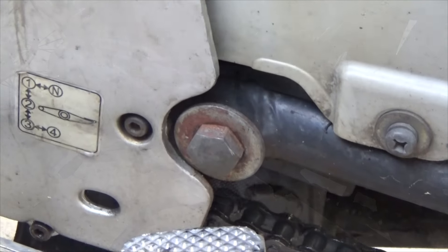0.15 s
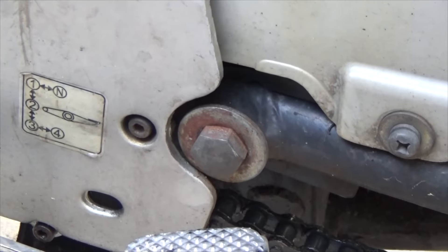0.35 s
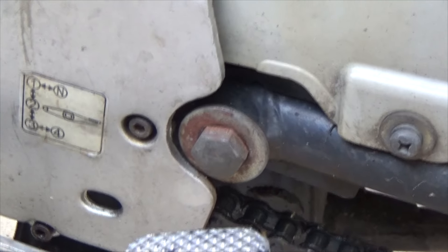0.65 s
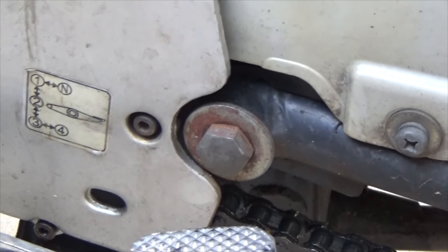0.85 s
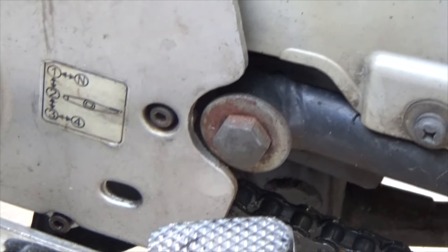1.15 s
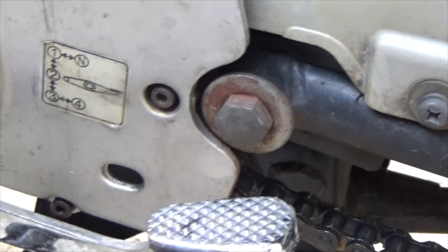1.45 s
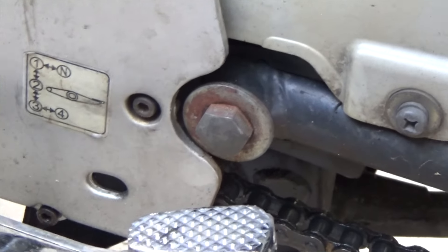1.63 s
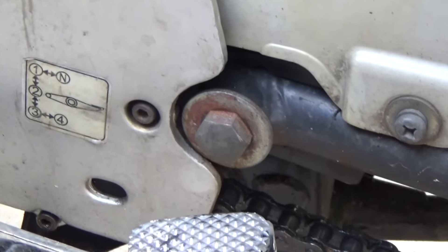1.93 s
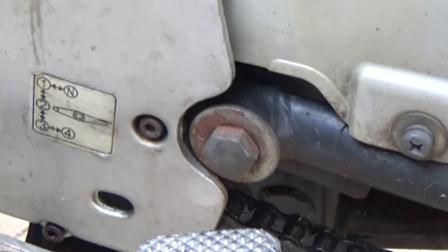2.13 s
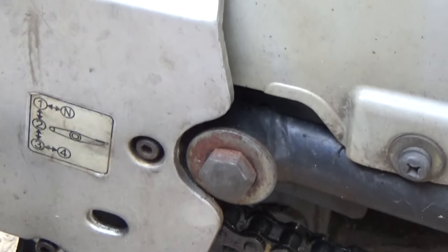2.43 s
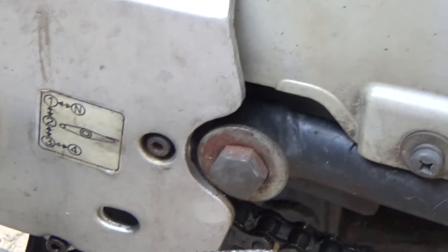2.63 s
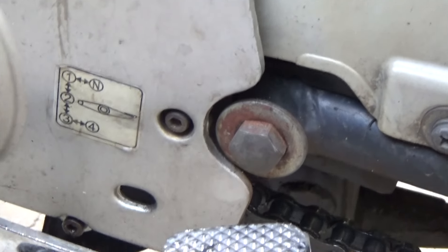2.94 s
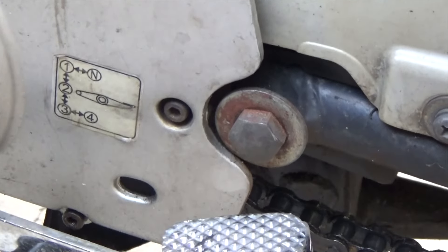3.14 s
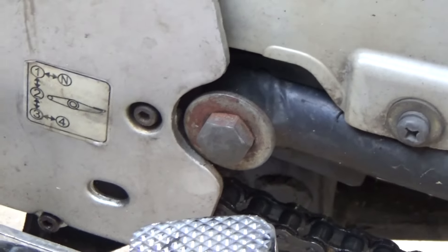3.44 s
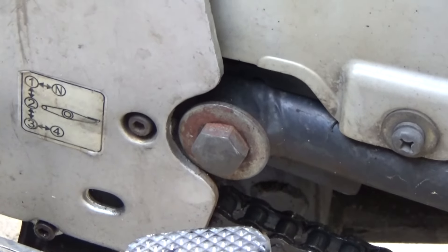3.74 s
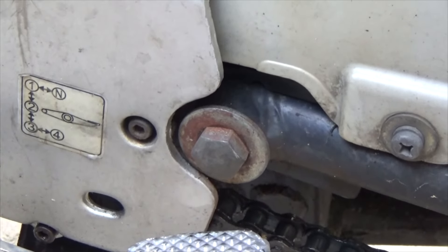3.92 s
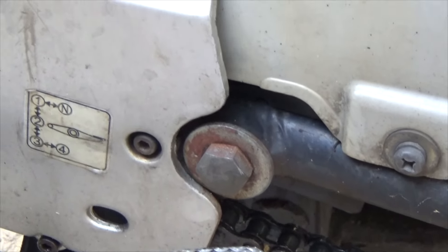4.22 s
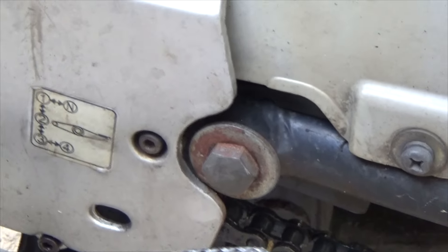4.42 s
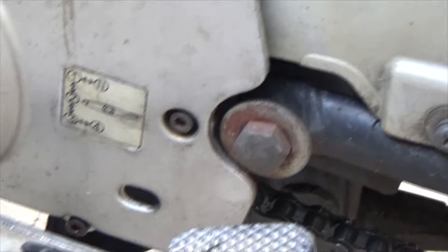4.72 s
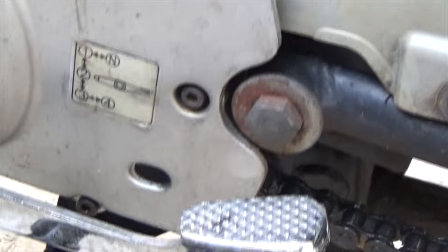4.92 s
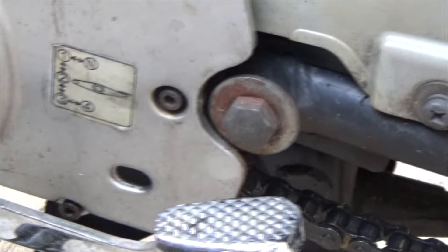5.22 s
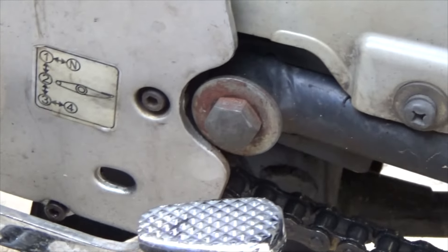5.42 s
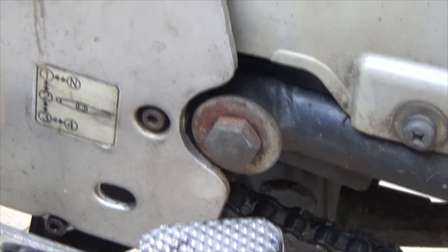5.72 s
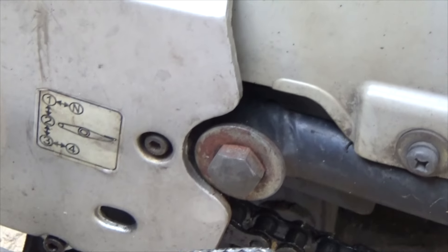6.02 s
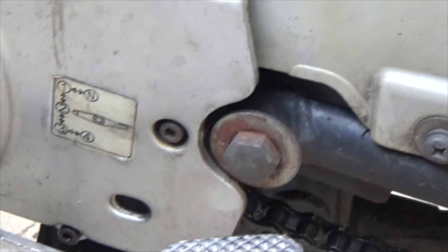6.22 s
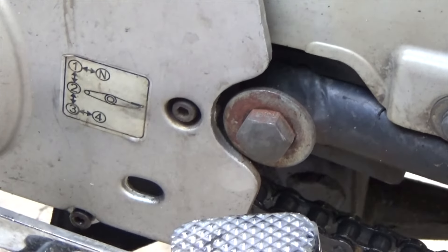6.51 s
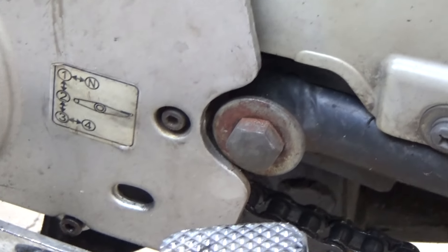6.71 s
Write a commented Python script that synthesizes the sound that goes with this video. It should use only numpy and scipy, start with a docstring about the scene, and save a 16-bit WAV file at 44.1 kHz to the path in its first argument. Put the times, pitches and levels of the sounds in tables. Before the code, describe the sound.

A motorcycle's rear suspension is bounced by hand outdoors, its dry pivot creaking softly, chattering in short squeaks, then giving long gliding metallic squeaks.

```python
"""A motorcycle is bounced on its rear suspension outdoors, and a dry pivot sticks and slips.
Four rounds follow each other: soft creaks as load builds, with short squeaks among them, then thin chirps
of a rubber bush, then one long gliding squeak; two more creaks close the scene.
Squeaks are trains of jolts that ring the steel frame, creaks are thumps with rubbing, chirps are tones.
A rumble, stronger at first, a faint hiss and a low hum that sinks and returns lie underneath."""
import sys
import numpy as np
from scipy import signal
from scipy.fft import rfft, irfft
from scipy.io import wavfile
from scipy.ndimage import uniform_filter1d

SR = 44100
rng = np.random.default_rng(int(sys.argv[2]) if len(sys.argv) > 2 else 0)


def to_wav(sig):
    """Store sig (one row per channel, or 1-D mono) as 16-bit WAV at the path in sys.argv[1].

    Samples outside -1..1 are clipped; the rate is SR.
    """
    pcm = np.clip(np.atleast_2d(sig), -1, 1) * 32767
    pcm = np.round(pcm).astype(np.int16)
    wavfile.write(sys.argv[1], SR, pcm.T)  # frames by channels


N = 302526

# Levels are those fed in, before the frame (for squeaks and rubs) and the limiter.
# long squeaks, one list each: (t/s, slip rate f/Hz, level/dB)
LONG_SQUEAKS = [
    [(1.395, 167, -35), (1.403, 167.4, -19), (1.443, 174.7, -21.5), (1.485, 240.4, -22),
     (1.499, 240.8, -25), (1.511, 228.4, -25.5), (1.523, 129, -25.5), (1.527, 99, -23), (1.541, 84.2, -25)],
    [(2.99, 252.7, -24), (3.058, 270, -21), (3.09, 260.7, -21.5), (3.114, 228.5, -17.5), (3.14, 185.2, -21),
     (3.172, 109.3, -16), (3.188, 100.4, -14.5), (3.25, 146, -19.5), (3.297, 179.6, -25.5)],
    [(4.884, 87.5, -23), (4.924, 134.9, -18), (4.948, 163.9, -18.5), (4.998, 179, -21),
     (5.036, 239.7, -18.5), (5.058, 267, -17), (5.09, 286, -22.5), (5.124, 273.4, -23.5),
     (5.156, 167, -29.5)],
    [(6.379, 142.1, -20), (6.393, 200.4, -25.5), (6.403, 230.9, -24), (6.425, 256, -18.5),
     (6.487, 299.6, -20), (6.521, 266.9, -18), (6.551, 213.4, -19), (6.575, 147.6, -12.5),
     (6.642, 82, -20.5)],
]
# short squeaks: (t/s, level/dB, length/s, slip rate f/Hz)
SHORT_SQUEAKS = [(.341, -20, 0.023, 92), (.393, -22, 0.022, 193), (.462, -21, 0.0069, 347),
                 (0.544, -20, .018, 110.4), (.593, -21.5, .019, 242.7), (0.66, -20.5, .007, 304.3),
                 (0.725, -22, 0.016, 130), (1.544, -29.5, .009, 200.4), (2.224, -19.5, 0.017, 244.2),
                 (2.252, -22, 0.03, 200.2), (2.308, -20, .024, 301.2), (2.358, -19.5, 0.027, 271),
                 (2.399, -21.5, 0.03, 209.8), (2.454, -22.5, 0.023, 253.2), (2.506, -19, 0.015, 249.5),
                 (2.564, -22, 0.0059, 331), (4.193, -22, 0.03, 290), (4.246, -21, 0.026, 180.5),
                 (4.294, -20.5, 0.024, 296), (4.347, -20.5, .023, 300), (4.395, -18.5, 0.017, 238),
                 (4.447, -21.5, 0.017, 141.5), (4.494, -24, 0.026, 271.7), (4.544, -23.5, 0.019, 100),
                 (4.847, -24.5, .02, 235.2), (5.16, -27, 0.012, 202), (5.838, -18, .2, 300.4),
                 (6.035, -28.5, 0.051, 177.2), (6.336, -24, 0.0064, 322.5)]
# soft creaks: (t/s, level/dB, nominal thump f/Hz, rub level against the thump/dB), before trims and fades
SOFT_CREAKS = [(.014, -29, 490, 0), (.069, -38, 430, 3), (.129, -34, 407, 9), (.174, -28.5, 490, 1),
               (.195, -37, 475, -2), (.239, -34.5, 437, -2.5), (.335, -26.5, 495, 2), (.386, -28, 525, -10),
               (.454, -27, 686, -2), (.537, -34, 487, 5), (.65, -25, 680, -3), (.718, -22.5, 680, -4),
               (.857, -32, 485, 0), (1.829, -44, 460, 6.5), (1.913, -45, 431, 12.5),
               (1.944, -39.5, 439, 10.5), (1.982, -42.5, 870, 15.5), (2.021, -26.5, 480, 1),
               (2.061, -27, 630, -1.5), (2.108, -27, 706, -0.5), (2.159, -32, 447, 3.5),
               (2.202, -26.5, 555, -6), (2.421, -26.5, 467, 8), (2.84, -38, 670, -2), (2.878, -33, 845, -1),
               (2.913, -37.5, 846, -4), (3.632, -39, 450, 3), (3.654, -42.5, 452, 5),
               (3.765, -39.5, 447, 6), (3.864, -44, 439, 8), (3.896, -31, 480, 5), (3.95, -31.5, 475, 7.5),
               (4.003, -28, 490, 3.5), (4.049, -38, 450, 14.5), (4.093, -31, 510, 5.5),
               (4.141, -24.5, 703, -1), (4.191, -25.5, 656, -6), (4.34, -29, 850, -9), (5.472, -34, 440, 0),
               (5.496, -31, 460, 3.5), (5.524, -39.5, 430, 7.5), (5.566, -26.5, 472, 2.5),
               (5.603, -31, 455, 10), (5.642, -20, 584, 0), (5.683, -30.5, 880, 10.5),
               (5.72, -22.5, 710, 1), (5.771, -24.5, 710, 3), (5.82, -22.5, 496, -2.5),
               (6.08, -24.5, 706, -2), (6.319, -38, 690, -9), (6.826, -27.5, 665, 5),
               (6.844, -18.5, 586, 2)]
# chirps of a rubber bush: (t/s, length/s, start f/Hz, end f/Hz, rms level of lowest tone/dB, overtone share)
BUSH_CHIRPS = [(1.159, 0.076, 760, 914, -52.5, 0.23), (1.219, 0.087, 1128, 1140, -57.5, 0.56),
               (1.235, .045, 896, 903, -57, 0.42), (1.294, 0.061, 1265, 2110, -54.5, 0.4),
               (2.69, 0.022, 795, 700, -48, .05), (2.709, 0.028, 803, 806, -43, 0.057),
               (2.747, .025, 620, 690, -47.5, .05), (4.784, 0.029, 980, 800, -54, .05),
               (4.813, 0.039, 797, 870, -47.5, .05), (4.798, 0.04, 640, 600, -54, .05),
               (6.153, 0.0254, 680, 870, -38.5, 0.14), (6.189, 0.032, 940, 1350, -50, .08),
               (6.253, 0.0076, 1640, 1680, -54, .2), (6.273, 0.01, 1680, 1760, -45.5, 0.19)]
# frame resonances reached by long squeaks, short squeaks and creak rubs: (f/Hz, spread/Hz, level/dB)
LONG_MODES = [(495, 130, -7), (1330, 54, -6), (1930, 210, -4), (2410, 45, -5), (2970, 52, -9),
              (3280, 110, -6), (3750, 54, -2), (4270, 77, -6), (4710, 240, -7), (5160, 120, -9),
              (5390, 46, -11), (5570, 43, -10), (5880, 80, -7), (6190, 51, 0), (6410, 63, -2),
              (6830, 95, -6), (7180, 85, -6), (7520, 54, -10), (8080, 170, -5), (8490, 48, -10),
              (9150, 52, -14), (9510, 130, -10), (9930, 220, -12), (10300, 140, -8), (10800, 100, -10),
              (11100, 36, -13), (11400, 110, -12), (12100, 210, -16), (12900, 120, -19), (13900, 160, -22)]
SHORT_MODES = [(474, 82, -5), (1350, 37, -7), (1940, 180, -3), (2420, 43, -4), (2580, 21, -7),
               (2900, 25, -9), (3290, 62, -1), (3550, 31, -7), (3780, 45, -5), (4370, 160, -6),
               (4810, 78, -6), (5180, 91, -2), (5460, 81, -4), (6210, 95, -7), (6920, 110, 0),
               (7140, 43, -3), (7560, 34, -8), (7930, 130, -9), (8210, 73, -8), (8580, 67, -8),
               (8950, 110, -6), (9350, 87, -7), (9600, 250, -6), (10300, 250, -8), (10700, 110, -9),
               (11100, 170, -11), (11600, 170, -6), (12100, 47, -12), (12800, 82, -14), (13700, 310, -20)]
RUB_MODES = [(466, 43.6, 6.5), (872, 39, -0.5), (1105, 8.7, -8), (1310, 130, -25), (1580, 81, -21),
             (1790, 24, -10.5), (2860, 37, -42), (3480, 38, -19.5), (3640, 30, -23), (3900, 93, -25.5),
             (4710, 39, -23.5), (5100, 230, -33), (5800, 47, -33), (7840, 100, -44.5), (8500, 93, -57),
             (10200, 115, -27), (11900, 61, -30), (12600, 170, -49)]
# dense small resonances between those: (f/Hz, level/dB)
LONG_FILL = [(200, -67), (330, -37), (420, -3.5), (560, -23), (750, -25.5), (1100, -8), (1550, -19),
             (2000, -8), (4000, -28.5), (6300, -33.5), (8500, -24), (11500, -89), (14000, -38),
             (16500, -74)]
SHORT_FILL = [(200, -40), (350, -12), (550, -15), (1000, -10), (2000, -9.5), (4000, -18), (6900, -21),
              (9500, -27.5), (11500, -44), (14000, -52), (16500, -64)]
RUB_FILL = [(200, -25), (400, -28), (800, -4), (1200, -20), (2000, -18.5), (3500, -34.5), (6000, -42),
            (10500, -51), (16000, -76)]
# free tubes and spring that ring on: (f/Hz, level/dB, time to fall 60 dB/s)
FREE_RINGS = [(400, -42, .16), (800, -55, .4), (1450, -60, .35), (1857, -59, .22), (2132, -55, .35),
              (3165, -65, .6), (6169, -46, .12)]
# dying away of the surroundings: (f/Hz, time to fall 60 dB/s)
YARD_DECAY = [(300, 0.34), (1500, 0.16), (5000, 0.15), (12000, 0.14)]
# left-right balance of the bike: (f/Hz, left minus right level/dB)
BALANCE = [(60, -2), (180, 2), (550, -3), (1650, -1), (4970, -1), (15000, -1.5)]
# stereo width of a response, before any widening: (f/Hz, side minus mid level/dB)
STEREO_WIDTH = [(60, -28), (150, -48), (380, -13.5), (950, -15.5), (2380, -11.5), (5980, -13), (15000, -29)]
# colour of the rumble and hiss: (f/Hz, relative level/dB)
AIR_COLOUR = [(15, -40), (25, -17), (80, -6), (150, -8), (192, -8), (259, -7.5), (296, -8), (568, -18),
              (1220, -23), (2750, -33), (3060, -29), (5130, -35), (9850, -31), (15200, -47), (16500, -60)]
# likeness of left and right in that air: (f/Hz, likeness 0-1)
AIR_LIKENESS = [(60, 0.99), (240, 0.7), (950, 0), (3770, 0.36), (15000, 1)]
# the hum before its wavering: (t/s, rms level/dB)
HUM_COURSE = [(0, -59), (1.3, -72), (2.2, -57.5), (6.86, -57.5)]

# unevenness of long squeaks, 0-1: a base, more when slips are few, more as the stroke slows down
STEADY, CRAWL_HZ, SLOWING = .06, 18, .41
# treble of long squeaks falls from start to end; slips weaker than FIRM lose treble, in dB per dB
SHARP_START_DB, SHARP_END_DB = 8.5, -8.5
FIRM_DB, SHORT_FIRM_DB, DULL_PER_DB = -22.5, -24, 4.47
SHORT_RISE_DB = .5  # over the length of each short squeak
RUB_S = .021
CHIRP_TOP_HZ = 5000  # overtones above this are lost
GROAN_FLOOR_DB, GROAN_AFTER_DB, GROAN_FADE_DB_PER_S = -54, -12.5, 84.5
RELIEF_DB = -3.5  # a long slide unloads the joint, so less groan follows
AIR_DB = -49.5  # rms of rumble and hiss together
RUMBLE_EXTRA_DB, RUMBLE_ENDS_S, RUMBLE_FADE_S = 9.5, .25, .13  # the fade is centred on the end
HUM_HZ = 79
EDGE_HZ = 16800  # upper limit of the whole sound
RESPONSE = 16384  # samples in a frame response


def glides():
    """The slip rate follows the speed of the stroke, so the pitch glides; gentler slips are duller."""
    drive = np.zeros(N)
    for rows in LONG_SQUEAKS:
        start_s, (rate, db) = columns(rows)
        slowed = 1 - rate / np.maximum.accumulate(rate)
        uneven = STEADY + (CRAWL_HZ / rate) ** 1.2 + SLOWING * slowed
        treble_db = np.linspace(SHARP_START_DB, SHARP_END_DB, len(db))
        treble_db += DULL_PER_DB * np.minimum(db - FIRM_DB, 0)
        force = slips(rate, np.clip(uneven, 0, 1), 4)
        add(drive, start_s, gain_of(db) * tilt_treble(force, treble_db))
    return ring(drive, frame(LONG_MODES, LONG_FILL, .0018, -3, -9))


def stutters():
    """The pivot lets go for a moment, chatters and locks again."""
    drive = np.zeros(N)
    for start_s, db, length_s, rate in SHORT_SQUEAKS:
        n = round(length_s * SR)
        treble_db = DULL_PER_DB * min(db - SHORT_FIRM_DB, 0)
        force = tilt_treble(slips(np.full(n, rate), .5, 2.28), treble_db)
        add(drive, start_s, gain_of(db + np.linspace(0, SHORT_RISE_DB, n)) * force)
    return ring(drive, frame(SHORT_MODES, SHORT_FILL, .000981, 2, -4))


def creaks():
    """A dull thump of a few cycles as the joint gives, then a short rub; a quiet groan between them."""
    thumps, n = np.zeros(N), round(RUB_S * SR)
    rubs = groan_level() * slips(np.full(N, 600.), 1, 1.0)
    t = np.arange(700) / SR
    swell = (t / .0028) * np.exp(1 - t / .0028)  # strongest 2.8 ms in
    for start_s, db, hz, rub_db in SOFT_CREAKS:
        thump = swell * np.sin(2 * np.pi * hz * t * (1.08 - t / .08))  # sags in pitch
        add(thumps, start_s, gain_of(db - 3) * thump)
        fading_db = db + rub_db - np.linspace(4, 10, n)
        add(rubs, start_s, gain_of(fading_db) * slips(np.full(n, 350.), .65, 1.76))
    return thumps + ring(rubs, frame(RUB_MODES, RUB_FILL, .00125, -44, -9.5))


def groan_level():
    """Rises as each creak starts or squeak ends, then sinks; a joint that slides freely is silent."""
    t, level_db = np.arange(N) / SR, np.full(N, GROAN_FLOOR_DB)
    moves = [(s, db) for s, db, *_ in SOFT_CREAKS]
    moves += [(s + length_s, db) for s, db, length_s, _ in SHORT_SQUEAKS]
    moves += [(rows[-1][0], rows[-1][2] + RELIEF_DB) for rows in LONG_SQUEAKS]
    for s, db in moves:
        sinking_db = db + GROAN_AFTER_DB - GROAN_FADE_DB_PER_S * (t - s)
        level_db = np.where(t > s, np.maximum(level_db, sinking_db), level_db)
    sliding = sum((t > rows[0][0]) & (t < rows[-1][0]) for rows in LONG_SQUEAKS)
    return gain_of(level_db) * (1 - sliding)


def chirps():
    """A fast smooth slip: a wavering tone with three overtones."""
    out = np.zeros(N)
    for start_s, length_s, start_hz, end_hz, db, share in BUSH_CHIRPS:
        n = round(length_s * SR)
        hz = np.linspace(start_hz, end_hz, n)
        phase = 2 * np.pi * np.cumsum(hz * (1 + .045 * wander(n, 130))) / SR
        overtones = sum(np.sin(k * phase) / (1 + (k * hz / CHIRP_TOP_HZ) ** 10) for k in range(2, 5))
        tone = np.sin(phase) + share * overtones
        add(out, start_s, np.sqrt(2) * gain_of(db) * tone * signal.windows.tukey(n, .45))
    return out


def slips(rate, uneven, grit):
    """One jolt for each stick-slip cycle, wavering in time and size, with grit while the surfaces slide."""
    n = len(rate)
    turns = np.cumsum(rate * (1 + .2 * uneven * wander(n, 200))) / SR
    jolts = np.diff(np.floor(turns), prepend=-1)  # one at every whole turn
    jolts = jolts * gain_of(4.56 * uneven * rng.standard_normal(n))
    since_slip_s = turns % 1 / rate
    sliding = np.exp(-since_slip_s / .002) * rng.standard_normal(n)
    bright = signal.butter(2, 2300, "high", fs=SR, output="sos")
    sliding = signal.sosfilt(bright, sliding)
    share = grit * uneven + .2
    return (evened(jolts) + share * evened(sliding)) / np.sqrt(1 + share ** 2)


def tilt_treble(force, treble_db):
    """Splits the jolts around 3500 Hz and raises or lowers the upper part."""
    soft = signal.sosfiltfilt(signal.butter(1, 3500, fs=SR, output="sos"), force)
    return soft + gain_of(treble_db) * (force - soft)


def frame(modes, fill, smear_s, long_db, yard_db):
    """Response to one slip: resonances over dense small modes, long rings and the surroundings."""
    t, hz = np.arange(RESPONSE) / SR, np.fft.rfftfreq(RESPONSE, 1 / SR)
    peaks = sum(gain_of(2 * db) / (1 + (1.7 * (hz - f) / w) ** 2) for f, w, db in modes)
    radiated = 1 / (1 + (350 / (hz + 20)) ** 10)  # thin tubes move little air in the bass
    fill_gain = gain_of(read(fill, hz))
    log_gain = np.log((fill_gain ** 2 + peaks) * radiated) / 2
    # choose the phase so that nothing sounds before the slip, then smear it a little
    mirrored = np.r_[log_gain, log_gain[-2:0:-1]]
    causal = np.exp(np.conj(signal.hilbert(mirrored)))[:RESPONSE // 2 + 1] * scatter(smear_s)
    body = irfft(spread_out(causal, causal * scatter(smear_s / 4)))
    body *= np.clip(3 - 4 * t / t[-1], 0, 1)
    lasting = sum(gain_of(db - 60 * t / t60) * np.sin(2 * np.pi * f * t) for f, db, t60 in FREE_RINGS)
    yard = surroundings(fill_gain + .36 * np.sqrt(peaks * radiated), 3.5)
    return body / np.linalg.norm(body[0]) + gain_of(long_db) * lasting + gain_of(yard_db) * yard


def ring(drive, response):
    """Every jolt sets off the whole stereo response, and they all add up."""
    return signal.fftconvolve(drive[None], response)[:, :N]


def scatter(smear_s):
    """Paths through the metal delay each band by a different part of smear_s, leaving its level alone."""
    delay = smear_s * (.2 + abs(wander(RESPONSE // 2 + 1, 90)))
    return np.exp(-2j * np.pi * np.cumsum(delay) * SR / RESPONSE)


def spread_out(mid, side):
    """Stereo pair of spectra: the side part is added on the left and taken away on the right."""
    side = side * gain_of(read(STEREO_WIDTH, np.fft.rfftfreq(RESPONSE, 1 / SR)))
    return np.array([mid + side, mid - side])


def surroundings(colour, wide_db):
    """A stereo tail: noise coloured like the frame, whose bands die at their own speed."""
    mid, side = rfft(rng.standard_normal((2, RESPONSE))) * colour
    noise = irfft(spread_out(mid, gain_of(wide_db) * side))
    f, frame_s, z = signal.stft(noise, SR, nperseg=128)
    z = z * gain_of(-60 * frame_s / read(YARD_DECAY, f)[:, None])
    tail = signal.istft(z, SR, nperseg=128)[1][:, :RESPONSE]
    return tail / np.linalg.norm(tail[0])


def air():
    """Distant rumble and hiss: noise shaped band by band, with drifting louder and softer patches."""
    frames, hz = N // 256 + 5, np.fft.rfftfreq(1024, 1 / SR)
    a, b, c, d, patches = rng.standard_normal((frames, 513, 5)).T
    patches = evened(uniform_filter1d(uniform_filter1d(patches, 12, 0), 14, 1))
    same = np.clip(read(AIR_LIKENESS, hz), -1, 1)[:, None]
    left = a + 1j * b
    right = same * left + np.sqrt(1 - same ** 2) * (c + 1j * d)
    frame_s = np.arange(frames) * 256 / SR
    early = np.clip((RUMBLE_ENDS_S - frame_s) / RUMBLE_FADE_S + .5, 0, 1)
    swell_db = RUMBLE_EXTRA_DB * early / (1 + (hz[:, None] / 600) ** 2)  # mostly in the bass
    z = np.array([left, right]) * gain_of(read(AIR_COLOUR, hz)[:, None] + 1.04 * patches + swell_db)
    return gain_of(AIR_DB) * evened(signal.istft(z, nperseg=1024, noverlap=768)[1][:, :N])


def hum():
    """A low sine tone that wavers slowly in level and pitch."""
    _, (db,) = columns(HUM_COURSE)
    level = np.sqrt(2) * gain_of(db + 3.6 * wander(len(db), 5000))
    hz = HUM_HZ * (1 + .023 * wander(len(db), 5000))
    return np.resize(level * np.sin(2 * np.pi * np.cumsum(hz) / SR), N)


def gain_of(db):
    """Turns decibels into a factor."""
    return 10 ** (np.asarray(db) / 20)


def evened(x):
    """Scales a signal to rms 1."""
    return x / np.sqrt(np.mean(x ** 2) + 1e-20)


def read(points, hz):
    """Reads a table at any frequency, along a logarithmic scale."""
    f, value = np.transpose(points)
    return np.interp(np.log(hz + 1), np.log(f + 1), value)


def add(mix, start_s, sound):
    """Lays a sound into the mix, cut off at the end."""
    part = mix[round(start_s * SR):][:len(sound)]
    part += sound[:len(part)]


def columns(rows):
    """Start time, and every other column drawn out to one value per sample."""
    s, *cols = np.transpose(rows)
    t = np.arange(s[0], s[-1], 1 / SR)
    return s[0], [np.interp(t, s, c) for c in cols]


def wander(n, samples):
    """Slow random drift of rms about 1."""
    return uniform_filter1d(rng.standard_normal(n), int(samples)) * np.sqrt(int(samples))


def scene():
    """The bike, balanced between left and right, over the air and the hum."""
    bike = glides() + stutters() + creaks() + chirps()
    lean_db = read(BALANCE, np.fft.rfftfreq(N, 1 / SR)) * np.array([[.5], [-.5]])
    return irfft(rfft(bike) * gain_of(lean_db), N) + air() + hum()


def record(dry):
    """A fast limiter levels the loudest squeaks; then the band limit."""
    power_db = 10 * np.log10(abs(uniform_filter1d((dry ** 2).mean(0), 300)) + 1e-12)
    excess_db = uniform_filter1d(np.maximum(power_db + 23, 0), 200)
    held = dry / gain_of(.6 * excess_db)
    held = .5 * np.tanh(2 * held)  # the sharpest peaks are rounded off
    band_limit = signal.firwin(511, EDGE_HZ, window=("kaiser", 9), fs=SR)
    return signal.oaconvolve(held, band_limit[None], "same")


dry = scene()
out = record(dry)
to_wav(out)
```